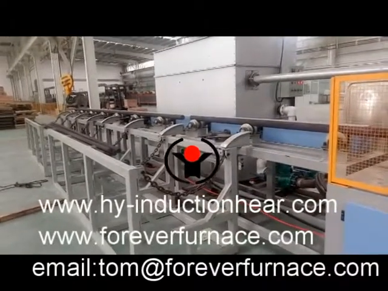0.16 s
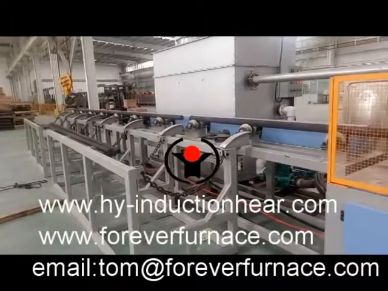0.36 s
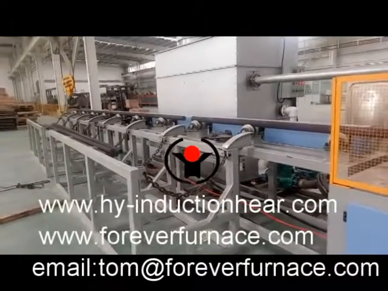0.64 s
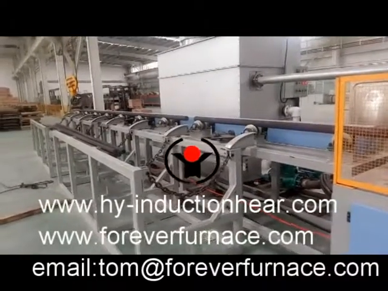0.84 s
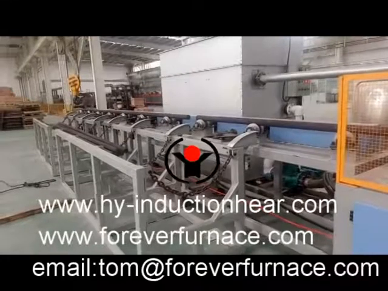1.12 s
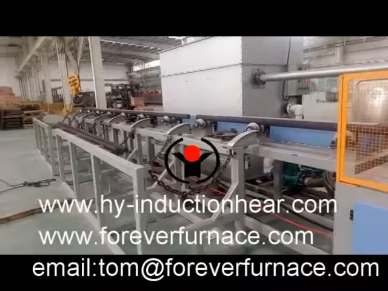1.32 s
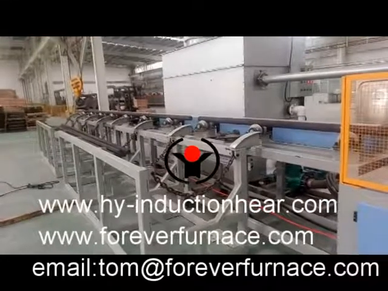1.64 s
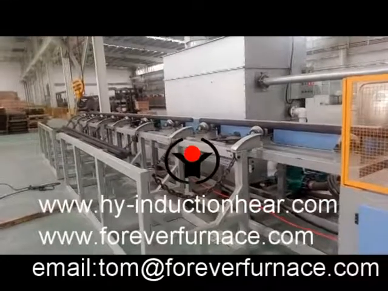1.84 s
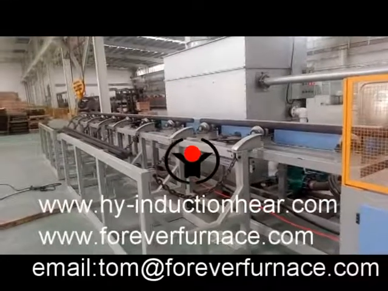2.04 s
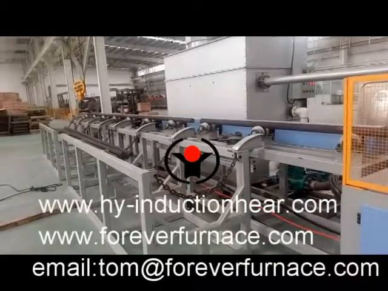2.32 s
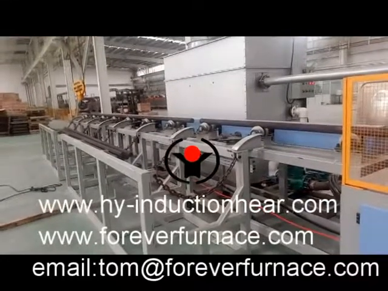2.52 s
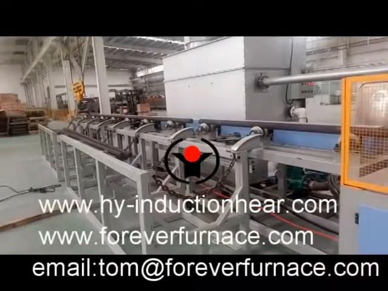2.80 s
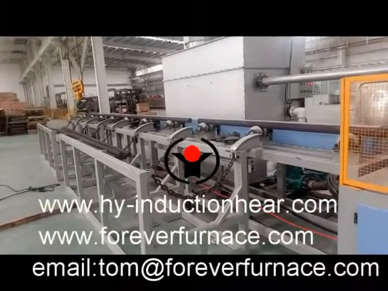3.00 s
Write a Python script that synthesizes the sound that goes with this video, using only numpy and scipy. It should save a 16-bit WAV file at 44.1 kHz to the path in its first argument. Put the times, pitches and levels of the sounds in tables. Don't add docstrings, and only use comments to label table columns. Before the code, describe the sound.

Industrial machinery roars steadily in a big factory hall, with humming, whining and faint distant knocks.

```python
import sys
import numpy as np
from scipy import signal
from scipy.fft import rfft, irfft, next_fast_len
from scipy.io import wavfile
from scipy.ndimage import uniform_filter1d, minimum_filter1d

SR = 44100
rng = np.random.default_rng(int(sys.argv[2]) if len(sys.argv) > 2 else 0)


def to_wav(sig):
    pcm = np.clip(np.atleast_2d(sig), -1, 1) * 32767
    pcm = np.round(pcm).astype(np.int16)
    wavfile.write(sys.argv[1], SR, pcm.T)


def gain_from_db(level_db):
    decades = np.asarray(level_db, float) / 20
    return 10 ** decades


N = 139356
SIZE = next_fast_len(N)
T = np.arange(N) / SR
F = np.fft.rfftfreq(SIZE, 1 / SR) + 1e-3
NARROW_HZ = 130

# frequency in Hz, level in dB, likeness from 0 to 1, lag in rad.
PORT = [(40, -1, .995, .14), (130, -2.5, .995, .42), (350, -6, .93, .8), (800, -11.3, .76, 1.0),
        (1350, -16, .15, 1.4), (1900, -17, .4, 3.9), (2800, -24.5, .1, 4.2), (4300, -34, .1, 4.2)]


def column(table, k, hz):
    rows = np.array(table, float)
    return np.interp(np.log(hz), np.log(rows[:, 0]), rows[:, k])


def walk(rate_hz):
    k = int(SR / rate_hz)
    held = np.repeat(rng.standard_normal(N // 400)[:N // k + 1], k)
    return 1.3 * uniform_filter1d(uniform_filter1d(held, k), k)[:N]


def at_ports(colour_db, level_db):
    a, b = rfft(rng.standard_normal((2, SIZE)))
    like = np.clip(column(PORT, 2, F), 0, 1)
    right = like * a * np.exp(-1j * column(PORT, 3, F)) + np.sqrt(1 - like ** 2) * b
    right = right * gain_from_db(column(PORT, 1, F))
    return np.array([a, right]) * gain_from_db(colour_db + level_db) / np.sqrt(np.mean(gain_from_db(colour_db) ** 2))


def noise_colour(table, slope_db):
    low_hz, (top_hz, top_db) = table[0][0], table[-1]
    db = np.where(F < top_hz, column(table, 1, F), top_db + slope_db * np.log2(F / top_hz))
    return db - 24 * np.clip(np.log2(low_hz / F), 0, 4)


def machinery():
    # frequency in Hz, density in dB per Hz.
    rumble = [(28, -18), (41, -14), (50, -10.5), (75, -7), (115, 3), (150, -2.5), (190, -4.5), (250, -2)]
    # frequency in Hz, density in dB per Hz.
    roar = [(300, -2.5), (900, -4), (1080, -7.5), (2300, -6.5), (3600, -13.5), (4900, -25), (6050, -25.5),
            (6700, -34.5)]
    # time in seconds, level in dB.
    load_points = [(0, .1), (.15, -2), (.35, -.5), (.5, 1.5), (.72, -1), (.85, .5), (.95, -1), (1.12, 1.5),
                   (1.38, -3.5), (1.57, .5), (1.9, -2), (2.2, .5), (2.45, -2.5), (2.68, -2.5), (2.85, -1.5),
                   (3.05, 3), (3.16, 2)]
    shared_db, neighbour_db, own_db = 1.36, 0.5, 0.16
    shared_hz, neighbour_hz, own_hz = 11.98, 5.58, 12

    both = at_ports(noise_colour(rumble, -24), -15.5) + at_ports(noise_colour(roar, -600), -14)
    place = np.clip(2 * np.log2(F / 40), 0, 15)
    load = np.interp(T, *np.array(load_points).T)
    shared, last, out = walk(shared_hz), walk(neighbour_hz), 0
    for k in range(16):
        new = walk(neighbour_hz)
        band = irfft(both * np.clip(1 - abs(place - k), 0, 1), SIZE)[:, :N]
        db = load * np.clip((6 - k) / 2, 0, 1)
        db = db + shared_db * min(k / 8, 1) * shared
        db = db + neighbour_db * (new + last) + own_db * walk(own_hz)
        out = out + band * gain_from_db(db)
        last = new
    return out


def tones(base_hz, table, turn_s):
    in_step_s = .78
    sway_db, sway_rad, sway_hz = 1.6, 0.4, 5
    out = 0
    for multiple, start_db, turn_db, end_db, right_db in table:
        hz = base_hz * round(multiple)
        db = np.interp(T, [0, turn_s, T[-1]], [start_db, turn_db, end_db]) + np.array([[0], [right_db]])
        sway = np.array([walk(sway_hz) for _ in range(4)])
        like = column(PORT, 2, hz)
        sway[1::2] = like * sway[::2] + np.sqrt(1 - like ** 2) * sway[1::2]
        lag = np.array([[0], [column(PORT, 3, hz)]])
        phase = 2 * np.pi * hz * (T - in_step_s) - lag + sway_rad * sway[2:]
        out = out + np.sqrt(2) * gain_from_db(db + sway_db * sway[:2]) * np.sin(phase)
    return out


def mains_hum():
    # multiple, left level in dB at the start, at the turn and at the end, right against left in dB.
    partials = [(1, -40, -39.5, -33, -4), (2, -33, -33.5, -33.5, -1), (3, -26.5, -32, -31.5, -1),
                (6, -38, -26.5, -28.5, -4.5), (10, -43, -37.5, -38, -4.5), (12, -27.5, -33, -41, -12),
                (28, -48, -47, -45, -0.5)]
    return tones(49.57, partials, turn_s=1.1)


def pump():
    # multiple, left level in dB at the start, at the turn and at the end, right against left in dB.
    partials = [(1, -33.5, -27, -36, -7), (2, -41.5, -36.5, -32, -7), (4, -31, -29, -68, -9.5),
                (8, -33, -30.5, -32.5, -11), (12, -47, -36, -52, -42.5), (16, -49.5, -51, -50, -32.5),
                (20, -60, -56, -58, -33)]
    return tones(296.64, partials, turn_s=1.75)


def inverter():
    # multiple, left level in dB at the start, at the turn and at the end, right against left in dB.
    partials = [(1, -25, -28.5, -32, -8), (2, -52, -52, -46, -16), (3, -70, -56, -58, -30)]
    return tones(2027.6, partials, turn_s=0.78)


def knocks():
    # start in seconds, centre in Hz, level in dB, t60 in seconds.
    hits = [
        (.004, 2300, -23, 0.44),
        (.47, 1800, -15, .15),
        (0.911, 2150, -22, 0.17),
        (.98, 2300, -22, 0.19),
        (1.24, 2190, -25, .15),
        (2.52, 2480, -18, 0.16),
        (2.62, 2530, -21, 0.19),
        (2.916, 1690, -26.5, 0.3),
    ]
    rise_s = 0.009
    out, noise = np.zeros((2, N)), rng.standard_normal((2, N))
    for at, hz, db, t60 in hits:
        i = int(at * SR)
        t = T[:min(SR // 3, N - i)]
        band = signal.butter(2, [hz / 2.5, hz * 1.6], "band", fs=SR, output="sos")
        ring = signal.sosfilt(band, noise[:, i:i + len(t)])
        out[:, i:i + len(t)] += ring / ring.std() * gain_from_db(db - 60 * t / t60) * (1 - np.exp(-t / rise_s))
    cover = signal.butter(3, 1500, fs=SR, output="sos")
    return np.array([out[0], signal.sosfilt(cover, out[1]) * gain_from_db(-12)])


def scene():
    return machinery() + mains_hum() + pump() + inverter() + knocks()


def gain_control(x):
    # time in seconds, gain in dB.
    ride = [(0, -2.6), (.12, -2.4), (.3, -0.3), (.45, 4), (.6, 1), (.9, 2.5), (1.15, 5), (1.4, 3),
            (1.6, -0.2), (1.9, 2.8), (2.3, 0.3), (2.6, 1.2), (2.9, 0.2), (3.16, 4)]
    limit_db, ratio, hold_s = -3, 7.1, 0.026
    x = x * gain_from_db(np.interp(T, *np.array(ride).T))
    k = int(hold_s * SR)
    want = np.minimum(1, (gain_from_db(limit_db) / (abs(x).max(axis=0) + 1e-9)) ** (1 - 1 / ratio))
    return x * uniform_filter1d(minimum_filter1d(want, k), k)


def patches(hz, s, share, band_hz):
    hold_s = 0.054
    cells = rng.random((200, 256))
    band = (hz / band_hz).astype(int)
    moment = (s / hold_s + cells[band, -1:]).astype(int)
    return cells[band[:, None], moment] < share


def thin_right(x):
    share = 0.7
    hz, s, z = signal.stft(x, SR, nperseg=2048)
    blink = patches(hz, s, share, 1.7 * NARROW_HZ) / np.sqrt(share)
    z *= np.where((hz < 3500)[:, None], 1, blink)
    lift_db = 7 * np.clip(np.log2(hz / PORT[-1][0] + 1e-9), 0, 1)
    z *= ((hz < 6650) * gain_from_db(lift_db))[:, None]
    return signal.istft(z, SR, nperseg=2048)[1][:N]


def broken_treble(x):
    # frequency in Hz, density in dB per Hz.
    fringe = [(6800, -2), (7200, 4), (7550, -14.5), (7700, -14.5), (10300, -18.5), (11500, -34.5),
              (12200, -29.5), (14400, -49)]
    # centre in seconds, length in seconds, lower edge in Hz, half the depth in dB.
    holes = [(0.118, 0.029, 4710, -8), (0.275, 0.018, 4740, -14), (0.31, .02, 4070, -3),
             (0.447, 0.014, 5100, -2.5), (0.552, 0.03, 4900, -5), (.755, .015, 5560, -6),
             (0.822, 0.013, 4230, -11), (0.986, 0.02, 5100, -3), (1.066, 0.014, 4130, -10),
             (1.13, 0.057, 5600, -17), (1.153, .025, 5100, -8), (1.22, .015, 5660, -7),
             (1.463, 0.046, 4960, -5), (1.606, 0.012, 5230, -9.5), (1.696, 0.026, 4750, -15),
             (1.78, .015, 4300, 0), (1.843, .018, 5100, -1.5), (1.94, 0.03, 5040, -6),
             (2.025, .018, 5130, -5.5), (2.11, 0.013, 5200, -1.5), (2.152, 0.013, 5140, -10),
             (2.238, 0.016, 4900, -2.5), (2.296, .015, 4200, 0), (2.391, 0.012, 5000, -7),
             (2.532, .03, 5600, -14), (2.765, .018, 4600, -2), (2.842, 0.022, 4200, -3),
             (2.94, 0.012, 4560, -0.5), (2.997, .02, 3700, -1.5), (3.056, .016, 5200, -4),
             (3.139, 0.02, 4300, -7)]
    hole_top_hz, hole_tall_hz, lean_s_per_khz = 6250, 1420, 0.0067

    left = at_ports(np.where(F > fringe[0][0], column(fringe, 1, F), -200), -57)[0]
    right_db = -7.5 - 34 * np.clip(np.log2(fringe[-2][0] / F), 0, 2)
    scraps = irfft(np.array([left, left * gain_from_db(right_db)]), SIZE)[:, :N]
    hz, s, z = signal.stft(np.r_[x[:1], [thin_right(x[1])], scraps], SR, nperseg=1024)

    ragged = 1 + 0.18 * (rng.random((60, len(s)))[(hz / 400).astype(int)] - .5) * 2
    for at, length, low_hz, depth_db in holes:
        late = at + lean_s_per_khz * (hz[:, None] - low_hz) / 1000
        tall = (hz > low_hz) & (hz < min(hole_top_hz, low_hz + hole_tall_hz))
        inside = np.clip(.5 + (length / 2 + 0.004 - abs(s - late)) / 0.0036, 0, 1)
        z[0] *= gain_from_db(2 * depth_db * ragged * inside * tall[:, None])

    edge = patches(hz, s, 0.59, NARROW_HZ) & (hz < 6800)[:, None]
    z[0] *= edge | (hz < hole_top_hz)[:, None]

    busy = (hz > 8960) & (hz < 10240)
    share = np.where(hz > 11700, .55, np.where(busy, .32, .12))
    near = patches(hz, s, 0.38, 430) * patches(hz, s, 0.83, NARROW_HZ)
    far = patches(hz, s * 1.3, share[:, None], 640) * patches(hz, s, .75, 2 * NARROW_HZ)
    on = np.where((hz < fringe[3][0])[:, None], near, far)
    splash = gain_from_db(-6) * (abs(s - .575) < .04 / 2)
    z[2:] *= np.maximum(on, splash)
    return signal.istft(z[:2] + z[2:], SR, nperseg=1024)[1][:, :N]


def low_pass(x):
    return signal.sosfilt(signal.butter(12, 14430, fs=SR, output="sos"), x)


def record(dry):
    mix = broken_treble(gain_control(dry))
    return low_pass(mix)


dry = scene()
out = record(dry)
to_wav(out)
```